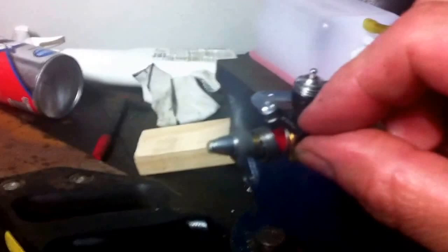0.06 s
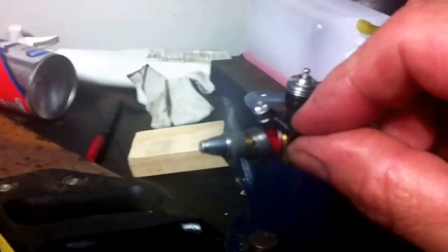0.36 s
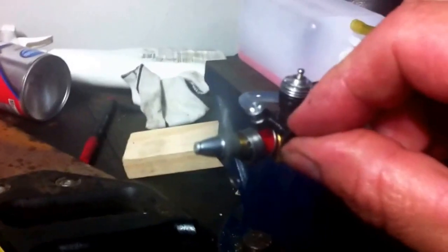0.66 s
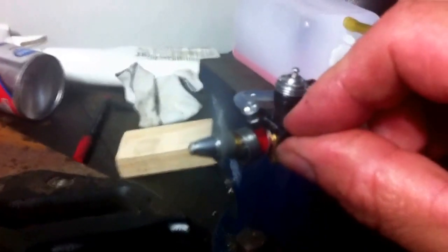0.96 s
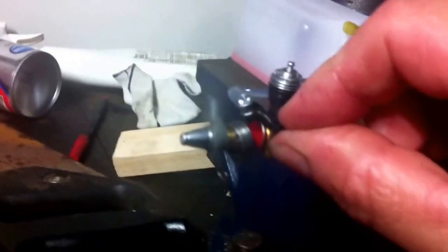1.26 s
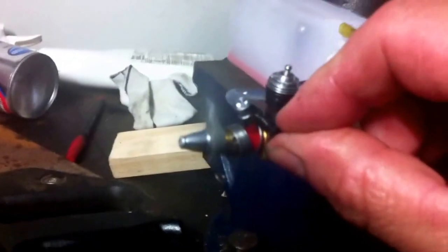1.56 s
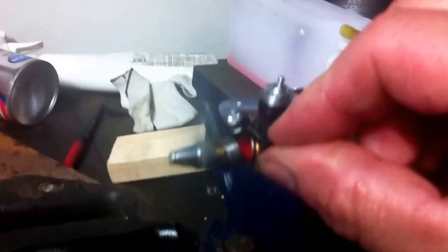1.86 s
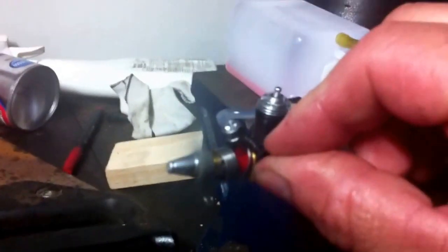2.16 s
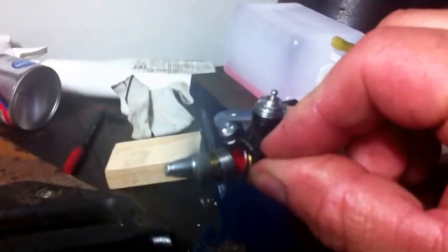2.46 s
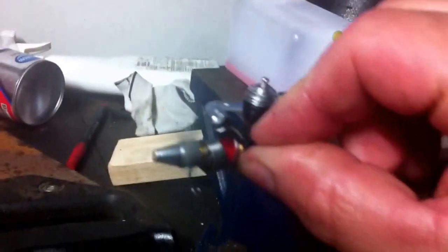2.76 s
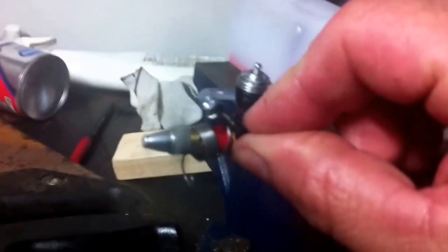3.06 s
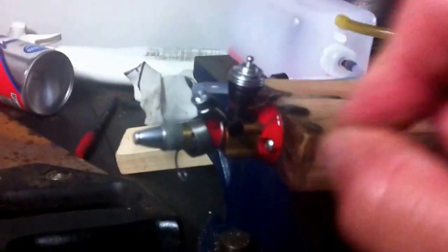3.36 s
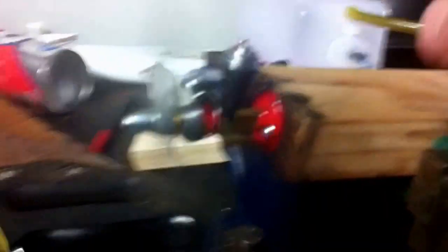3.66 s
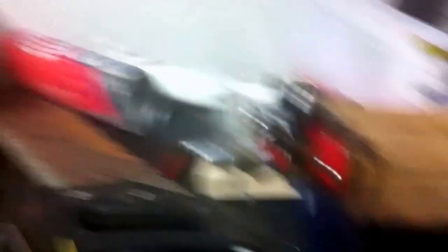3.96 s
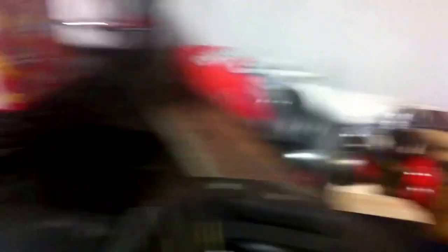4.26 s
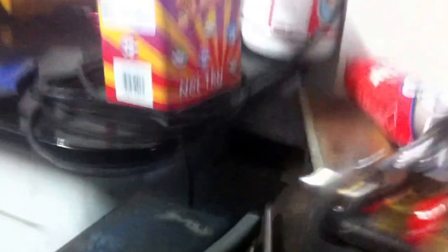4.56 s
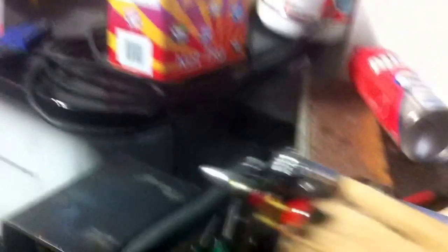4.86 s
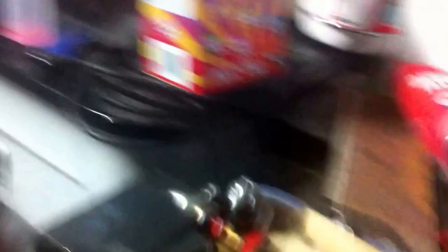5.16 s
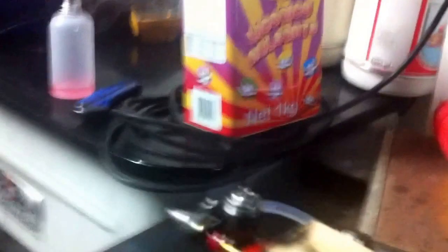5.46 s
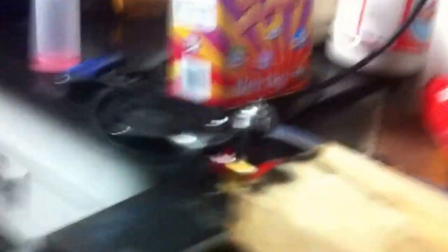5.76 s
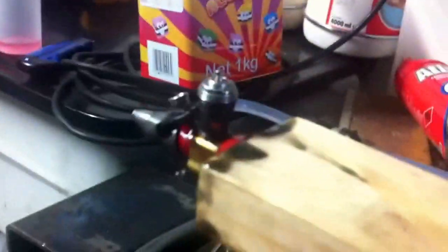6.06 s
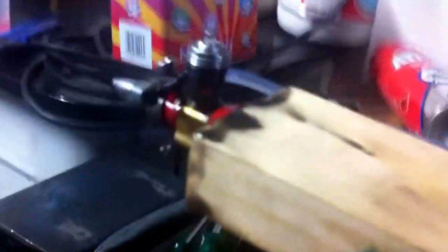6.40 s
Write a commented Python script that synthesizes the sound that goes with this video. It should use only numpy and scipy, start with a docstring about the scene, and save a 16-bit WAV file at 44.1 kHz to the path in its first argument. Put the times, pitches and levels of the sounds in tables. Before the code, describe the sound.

The high, buzzing whine of a small model engine rises to a peak, then drops and hunts unevenly, with brief propeller wind.

```python
"""A tiny two-stroke glow engine clamped to a workbench, the microphone close beside it and overdriven
by the exhaust cracks, one per revolution. It starts rich, firing strong and weak by turns, and rasps.
Leaned out by its needle valve, it climbs and sings cleanly at its peak, about 3 s in. The microphone
catches the propeller wash and moves round to the front as the engine sags and hunts; for the last
second it is above the engine."""
import sys
import numpy as np
from scipy import signal
from scipy.fft import rfft, irfft
from scipy.io import wavfile
from scipy.ndimage import uniform_filter1d, map_coordinates

SR = 44100
rng = np.random.default_rng(int(sys.argv[2]) if len(sys.argv) > 2 else 0)


def pcm_store(signal):
    """Save signal as 16-bit PCM."""
    levels = np.round(np.clip(np.atleast_2d(signal), -1, 1) * 32767)
    wavfile.write(sys.argv[1], SR, levels.astype(np.int16).T)


N = 283563
TIME = np.arange(N) / SR


def crankshaft(speed, flutter, rich_flutter):
    """Revolutions turned so far; the speed flutters, more so when the burn is uneven."""
    depth = flutter + rich_flutter * unevenness(speed)
    return np.cumsum(speed * (1 + depth * drift(40))) / SR


def unevenness(speed):
    """A rich mixture burns unevenly (0-1) and runs slowly; rougher as it sags, smoother as it picks up."""
    # the hunting engine catches and fires more evenly: middle_s, length_s
    catches = [(3.79, 0.062), (5.393, 0.12)]
    clean_hz, clean_width_hz, inertia_s = 400, 12, .045
    drive = speed + inertia_s * SR * np.gradient(speed)  # the speed lags the burn
    ragged = 1 / (1 + np.exp((drive - clean_hz) / clean_width_hz))
    caught = sum(spell(s, length) for s, length in catches)
    depth = .66 - .85 * octaves(drive)
    return np.clip(.05 + ragged * (1 - .74 * caught) * depth, 0, 1)


def firings(turns, richness, misfire_db, lag_s, jitter_s, jet_db, jet_s):
    """One crack per revolution as the port opens, each trailed by a short turbulent jet."""
    at = np.interp(np.arange(np.ceil(turns[-1])), turns, np.arange(N))
    rich = richness[at.astype(int)]
    chance = rng.standard_normal((len(at), 2))
    # a strong burn leaves spent gas that spoils the next one: strong and weak alternate
    spoiled = rms_one(signal.lfilter([1], [1, .6, -.22], chance[:, 0]))
    # the richer the mixture, the more often and the worse the charges fail
    weakness = np.sqrt(rich) * np.tanh(np.maximum(spoiled + rich - .75, 0)) * np.minimum(4 * rich, 1)
    at = at + SR * (lag_s * weakness + jitter_s * rich * chance[:, 1])  # weak charges leave late
    cracks = clicks(at, from_db(-misfire_db * weakness))
    tails = signal.lfilter([1], [1, -np.exp(-1 / (jet_s * SR))], cracks)
    jet = tails * rng.standard_normal(N)
    return rms_one(cracks) + from_db(jet_db) * richness * rms_one(jet)


def exhaust(turns, speed, shares):
    """The cracks ring in cylinder and port; their colour depends on where the microphone is."""
    # one crack from beside, in front and above: frequency_hz, level_db
    beside_colour = [(200, -73), (850, -17.5), (1150, -13.5), (1400, -10.5), (1800, -3.5), (2400, -4),
                     (3000, -9.5), (3800, -12), (4950, -1), (5350, -2.5), (5850, 3.5), (6400, -5.5),
                     (7200, -2), (9100, -15.5), (10800, -14), (12200, -22), (13700, -16), (15700, -25)]
    front_colour = [(200, -57.5), (850, -10), (1150, -15.5), (1600, -6.5), (2250, -4.5), (3000, -10),
                    (4400, -5), (5650, 2), (6600, -2.5), (7400, -5), (8700, -13), (10600, -16),
                    (12500, -22.5), (15700, -29)]
    above_colour = [(200, -52.5), (850, -8.5), (1150, -13.5), (1600, -10), (2300, -2.5), (3500, -5.5),
                    (4600, -2), (6400, -3), (7300, -6.5), (8200, -8), (12300, -14.5), (15700, -27)]
    pulses = firings(turns, unevenness(speed), misfire_db=11, lag_s=.000012, jitter_s=.00001,
                     jet_db=-11.5, jet_s=.0015)
    beside = smeared(coloured(pulses, beside_colour), hz=6250, width_hz=3770)
    front = smeared(coloured(pulses, front_colour), hz=6560, width_hz=17000)
    above = smeared(coloured(pulses, above_colour), hz=6100, width_hz=11500)
    cracks = hollow(np.sum(shares * [beside, front, above], axis=0), width_share=.16)
    in_room = workshop(glance(cracks), bench_db=-11.5, room_db=-9, room_t60_s=.18)
    return exhaust_bands(in_room, speed, shares)


def exhaust_bands(sound, speed, shares):
    """Low bark, middle whine and top sizzle; the whine grows louder and sharper with speed."""
    # the bark: time_s, level_db
    bark_curve = [(0, -25.5), (1.05, -25.5), (2.0, -23), (2.8, -19.5), (3.4, -21.5), (3.8, -25),
                  (4.55, -27.5), (5.1, -29), (5.28, -21.5), (5.58, -32.5), (6.43, -30)]
    # the whine at cruising speed: beside_db, front_db, above_db
    cruise_db = [-15.3, -14, -17.5]
    # the sizzle: time_s, level_db
    sizzle_curve = [(0, -31.5), (2.0, -28.5), (2.8, -27.5), (3.75, -24.5), (4.4, -29), (5.15, -26.5),
                    (5.28, -22.5), (5.42, -32.5), (5.95, -32), (6.3, -25)]
    bark_hz, treble_hz, sizzle_hz = 2900, 4860, 8500
    rise_db = 10.5 * octaves(speed)
    bark, below_treble, below_top = (lows(sound, hz) for hz in (bark_hz, treble_hz, sizzle_hz))
    whine = below_treble - bark + from_db(rise_db) * (below_top - below_treble)
    # a short wash of dense echoes softens the top sizzle
    top = sound - below_top
    sizzle = .5 * top + convolve(top, reflections(0, .065))
    levels_db = in_time(bark_curve)[0], cruise_db @ shares + rise_db, in_time(sizzle_curve)[0]
    bands = bark, whine, sizzle
    return sum(from_db(db) * band / local_rms(band) for db, band in zip(levels_db, bands))


def smeared(x, hz, width_hz):
    """All-pass: the ring near hz takes a moment to build up."""
    radius = np.exp(-np.pi * width_hz / SR)
    poles = [1, -2 * radius * np.cos(2 * np.pi * hz / SR), radius * radius]
    return signal.lfilter(poles[::-1], poles, x)


def hollow(x, width_share):
    """Hollow rings and notches swell and fade in the exhaust, most of them as the microphone moves."""
    # rings and notches: middle_s, length_s, centre_hz, lift_db
    hollows = [(.8, 2.2, 13800, -10), (2.8, 1.4, 4940, -2.5), (3.756, 0.35, 5750, 1.5),
               (4.45, .3, 8100, 2.5), (4.8, 0.21, 6400, 0.5), (5.06, 0.26, 3640, -13),
               (5.282, 0.14, 7500, 11), (5.404, 0.15, 4100, 9), (5.436, 0.12, 6200, -4),
               (5.578, .12, 3220, 5.5)]
    for s, length, hz, lift_db in hollows:
        edges = hz * (1 + width_share / 2 * np.array([-1, 1]))
        band = signal.sosfilt(signal.butter(1, edges, "band", fs=SR, output="sos"), x)
        x = x + (from_db(lift_db * spell(s, length)) - 1) * band
    return x


def hum(turns, speed, shares, rise_db_per_octave, waver_db):
    """The first two orders stay smooth however a charge burns; the first grows with speed and wavers."""
    # first order at cruising speed: beside_db, front_db, above_db
    cruise_db = [-40.3, -38, -41]
    # second order: time_s, level_db
    second_curve = [(0, -51), (1.3, -42.5), (1.7, -53), (2.2, -57), (3.1, -35.5), (3.7, -38), (4.3, -42),
                    (5.1, -34), (6.43, -38.5)]
    angle = 2 * np.pi * turns
    first_db = cruise_db @ shares + rise_db_per_octave * octaves(speed) + waver_db * drift(16)
    first = from_db(first_db) * np.sin(angle)
    second = from_db(in_time(second_curve)[0]) * np.sin(2 * angle)
    return np.sqrt(2) * (first + second)


def propeller(speed, lumpy_db, hiss_db, puff_s):
    """Propeller air rumbles on the microphone in lumps; the blades hiss more with speed."""
    # wash, strongest as the microphone crosses the airstream: time_s, level_db
    wash_curve = [(0, -74), (1.9, -59), (3.15, -47.5), (3.4, -34), (3.8, -41), (4.4, -43), (5.05, -49),
                  (5.3, -58), (6.43, -57)]
    # puffs of wash: middle_s, level_db
    buffets = [(2.75, -36), (2.86, -40), (3.619, -28.5)]
    # wash rumble, then blade and intake hiss: frequency_hz, level_db
    wash_colour = [(20, -11), (60, -10), (100, -12), (145, 0), (200, 2.5), (300, -4.5), (500, -6.5),
                   (900, -13), (2000, -26), (6000, -65)]
    hiss_colour = [(60, -66), (130, -37), (300, -0.5), (700, -2), (2700, 6), (3600, 8), (4500, -13.5),
                   (8000, -7), (15000, -33)]
    stream = from_db(in_time(wash_curve)[0] + lumpy_db * drift(25))
    puffs = sum(from_db(db) * np.exp(-((TIME - s) / puff_s) ** 2) for s, db in buffets)
    rumble = (stream + puffs) * coloured(rng.standard_normal(N), wash_colour)
    hiss = from_db(hiss_db) * speed / speed.max() * coloured(rng.standard_normal(N), hiss_colour)
    return rumble + hiss


def microphone_shares():
    """The microphone moves round the engine: the share of each place at every sample."""
    # its path: time_s, place (0 beside, 1 in front, 2 above)
    path = [(0, 0), (3.5, 0), (4.1, 1), (5.15, 1), (5.35, 2)]
    place, = in_time(path)
    return np.array([np.maximum(1 - abs(place - k), 0) for k in range(3)])


def glance(x):
    """The nearest surface adds one quick echo."""
    # the echo: time_s, delay_ms, gain
    echo = [(0, 0.87, 0.13), (3.9, 0.49, 0.01), (4.2, 0.44, 0.21), (4.85, 0.49, 0.07), (5.35, .23, 0.03),
            (5.6, .37, 0)]
    delay_ms, gain = in_time(echo)
    return x + gain * map_coordinates(x, [(TIME - delay_ms / 1000) * SR], order=3)


def workshop(x, bench_db, room_db, room_t60_s):
    """Bench clutter and walls answer each crack; the pattern changes as the microphone moves."""
    places_s = [0, 1.6, 3.4, 4, 4.4, 5.1, 5.5, 6.4]
    out = x
    for here in np.eye(len(places_s)):
        bench = from_db(bench_db) * reflections(.00057, .019)
        walls = from_db(room_db) * reflections(.005, room_t60_s)
        out = out + np.sqrt(np.interp(TIME, places_s, here)) * convolve(x, bench + walls)
    return out


def reflections(first_s, t60_s):
    """Dense echoes that start after first_s and die away; energy 1."""
    t = np.arange(SR // 3) / SR
    echoes = rng.standard_normal(len(t)) * (t > first_s) * from_db(-60 * t / t60_s)
    return echoes / np.sqrt(np.sum(echoes ** 2))


def octaves(speed, cruise_hz=380):
    """Speed in octaves above cruising speed."""
    return np.log2(speed / cruise_hz)


def spell(s, length):
    """A soft-edged window of height 1 around time s."""
    return np.exp(-(2 * (TIME - s) / length) ** 4)


def drift(per_s):
    """Smooth random wander; rms 1."""
    knots = rng.standard_normal(int(N / SR * per_s) + 2)
    return rms_one(map_coordinates(knots, [TIME * per_s], order=3, mode="nearest"))


def clicks(at, heights, size=8):
    """Band-limited clicks placed between samples."""
    index = at.astype(int)[:, None] + np.arange(1 - size, size + 1)
    offset = index - at[:, None]
    shape = np.sinc(offset) * np.sinc(offset / size)
    return np.bincount(np.clip(index, 0, N - 1).ravel(), (heights[:, None] * shape).ravel(), N)


def coloured(x, spectrum, size=4096):
    """Minimum-phase filter with the outline frequency_hz, level_db; the result has rms 1."""
    hz, db = np.transpose(spectrum)
    grid = np.maximum(np.fft.rfftfreq(size, 1 / SR), 1)
    gain = from_db(np.interp(np.log(grid), np.log(hz), db))
    cepstrum = irfft(np.log(gain))
    cepstrum[1:size // 2] *= 2
    cepstrum[size // 2 + 1:] = 0
    return rms_one(convolve(x, irfft(np.exp(rfft(cepstrum)))))


def lows(x, hz):
    """What lies below hz, with no delay."""
    return signal.sosfiltfilt(signal.butter(4, hz, fs=SR, output="sos"), x)


def local_rms(x, size=1400):
    """Level over about a dozen revolutions."""
    power = uniform_filter1d(uniform_filter1d(x ** 2, size), size // 2)
    return np.sqrt(np.abs(power) + 1e-14)


def convolve(x, response):
    """Pass x through an impulse response."""
    return signal.fftconvolve(x, response)[:N]


def in_time(rows):
    """Each column of a curve at every sample."""
    s, *columns = np.transpose(rows)
    return [np.interp(TIME, s, c) for c in columns]


def rms_one(x):
    """Scale to an rms of 1."""
    return x / np.sqrt(np.mean(x ** 2) + 1e-20)


def from_db(db):
    """Decibels to gain."""
    return 10 ** (np.asarray(db) / 20)


def scene():
    """Exhaust, hum and propeller follow the crankshaft; one microphone feeds both channels."""
    # crankshaft speed: time_s, revolutions_per_s
    speed_curve = [(0.0, 258.0), (0.29, 265.1), (0.55, 311.5), (0.62, 313.9), (0.7, 309.0), (0.88, 314.8),
                   (0.97, 331.0), (1.07, 340.7), (1.14, 343.2), (1.38, 364.3), (1.57, 370.9), (1.84, 376.4),
                   (2.35, 431.0), (2.54, 433.9), (2.74, 450.9), (3.1, 460.8), (3.17, 454.1), (3.47, 456.5),
                   (3.74, 380.6), (3.81, 381.2), (3.97, 363.3), (4.12, 386.3), (4.17, 393.0), (4.32, 367.8),
                   (4.44, 360.7), (4.49, 374.4), (4.6, 386.7), (4.66, 380.4), (4.75, 362.6), (4.89, 362.2),
                   (4.98, 374.2), (5.12, 365.2), (5.19, 370.1), (5.35, 390.9), (5.5, 390.2), (5.55, 375.5),
                   (5.66, 359.8), (5.77, 347.9), (6.0, 354.1), (6.09, 378.8), (6.21, 398.0), (6.43, 373.9)]
    speed = uniform_filter1d(in_time(speed_curve)[0], size=700)
    turns = crankshaft(speed, flutter=.0009, rich_flutter=.0005)
    shares = microphone_shares()
    air = propeller(speed, lumpy_db=1.6, hiss_db=-39, puff_s=.018)
    cracks = exhaust(turns, speed, shares)
    sound = cracks + hum(turns, speed, shares, rise_db_per_octave=12.5, waver_db=1.4) + air
    return np.array([sound, sound])


def record(dry):
    """The close, overdriven microphone flattens the tallest cracks; bass and top are cut."""
    oversampled = signal.resample_poly(dry, 2, 1, axis=1)
    ceiling = np.where(oversampled > 0, .6, .68)
    clipped = oversampled / (1 + (oversampled / ceiling) ** 8) ** (1 / 8)
    flattened = signal.resample_poly(clipped, 1, 2, axis=1)
    thinned = signal.sosfilt(signal.butter(2, [95, 14000], "band", fs=SR, output="sos"), flattened)
    top_cut = signal.firwin(601, cutoff=15750, fs=SR)
    return signal.fftconvolve(thinned, top_cut[None], "same", axes=1)


dry = scene()
out = record(dry)
pcm_store(out)
```